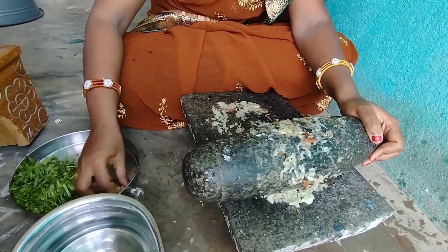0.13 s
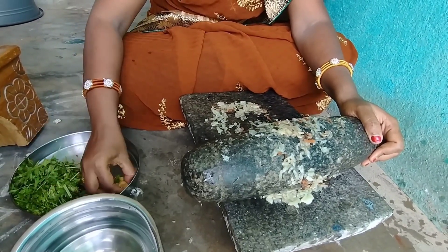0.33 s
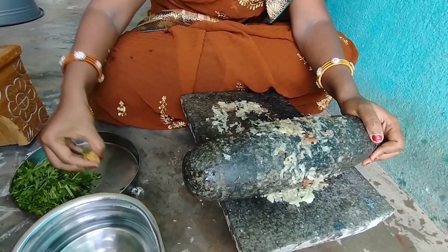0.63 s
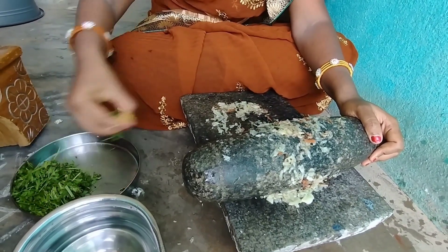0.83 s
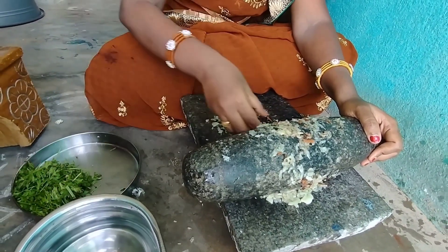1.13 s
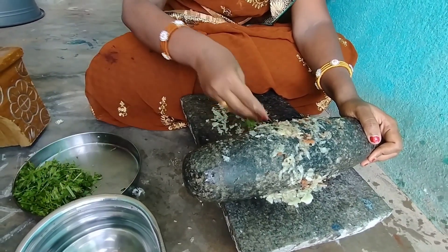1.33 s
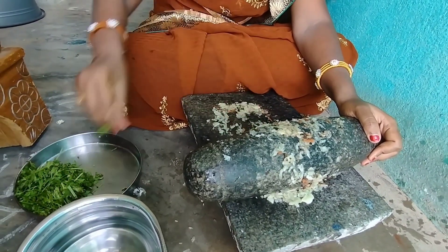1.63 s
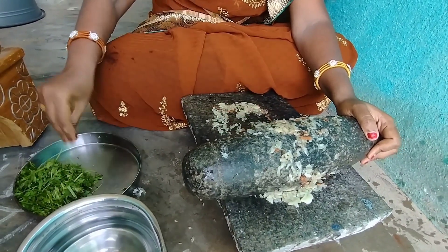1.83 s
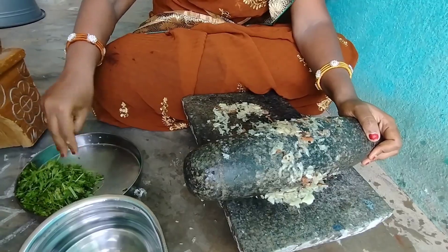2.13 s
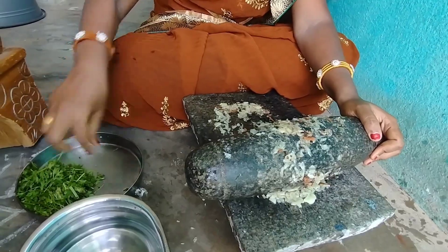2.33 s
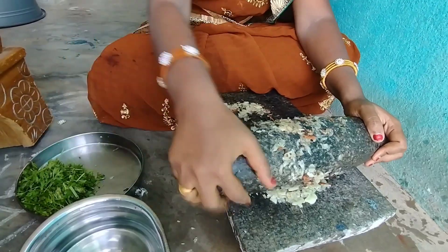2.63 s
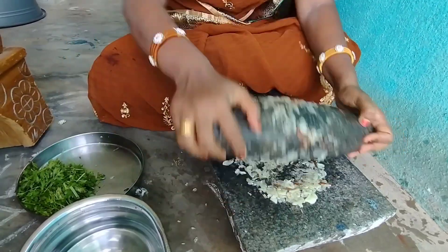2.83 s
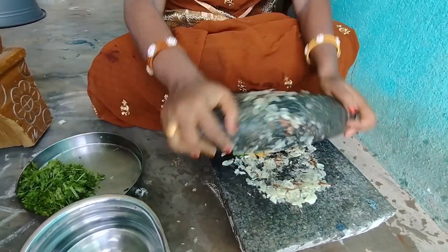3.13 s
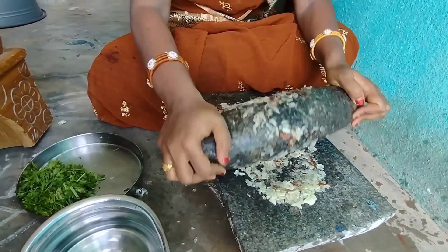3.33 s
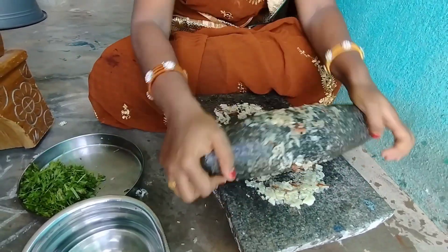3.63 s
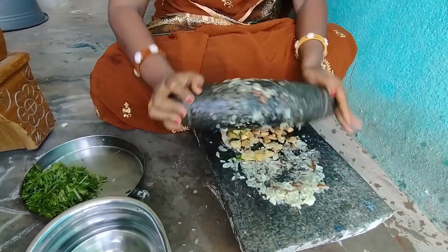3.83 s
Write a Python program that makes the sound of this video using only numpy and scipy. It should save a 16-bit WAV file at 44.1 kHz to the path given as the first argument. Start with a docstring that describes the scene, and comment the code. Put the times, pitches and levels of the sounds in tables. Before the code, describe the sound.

A stone roller crushing ginger and garlic on a slab is the main sound, close in a small room. First, ginger scratches on a ringing steel plate until 0.8 seconds. Bangles tick faintly from 1.6 to 2.6 over soft air. From 2.8 the pulp crackles and the roller rumbles, with a faint, far whistle. Stone knocks land at 3.0, loudest at 3.3, and at 3.6, where everything cuts off.

```python
"""In a small room with hard walls, a cook picks ginger from a steel plate, which scratches and rings.
Bangles tick in the pause. Then a stone roller rocks over wet ginger and garlic on a stone slab:
the pulp squelches and crackles, and the roller rumbles and knocks on the slab.
The walls throw the sound back, over soft air and a faint, far whistle.
The sound stops dead during the last knock."""
import sys
import numpy as np
from scipy import signal
from scipy.fft import rfft, irfft
from scipy.io import wavfile
from scipy.ndimage import uniform_filter1d

SR = 44100
rng = np.random.default_rng(int(sys.argv[2]) if len(sys.argv) > 2 else 0)


def bounce(signal):
    """Save signal as a 16-bit WAV file at the path given by the first command-line argument."""
    frames = np.transpose(np.atleast_2d(signal))
    limited = np.clip(frames, -1, 1)
    pcm = np.round(limited * 32767).astype(np.int16)
    wavfile.write(sys.argv[1], SR, pcm)


N = 176400
TIME, HZ = np.arange(N) / SR, np.fft.rfftfreq(4096, 1 / SR)

# Each blow of the roller: start_s, strength_db, treble_limit_hz, bass_limit_hz, ping_db
ROLLER_BLOWS = [(3.0123, -3, 1070, 90, -8), (3.0256, -8.5, 1050, 90, -17), (3.34, 3, 2300, 350, 8),
                (3.5911, 2, 352, 130, -29), (3.6126, -1.5, 747, 111, -12)]
# Tone of the dry clack of stone on stone: pitch_hz, level_db
CLACK_TONE = [(40, -41), (110, -15.5), (350, -2.5), (750, 9.5), (1000, 12), (1550, 5.5), (2200, -3.5),
              (3500, -3), (5000, -3.5), (8000, -27.5), (15000, -29)]
# Notes the slab and floor ring with: pitch_hz, level_db, ring_s
SLAB_NOTES = [(125, -32.5, .23), (181.2, -22, .17), (236, -23, 0.085), (349, -15.5, .08), (710, -30, .19),
              (853, -29.5, .23), (960, -7.5, 0.022), (1095, -26, 0.2), (1355, -29, 0.23),
              (1468, -24.5, 0.16)]
# Notes of the roller's own ping: pitch_hz, level_db, ring_s
ROLLER_NOTES = [(3466, -33.5, 0.045), (3580, -43, 0.08), (4495, -35, 0.059), (4545, -39.5, .15),
                (5345, -61, .25), (6700, -49.5, 0.23)]
def roller_knocks():
    """The roller lands: pulp cushions the blow, bare stone makes it thin and bright, with a ping."""
    blows, pings = np.zeros(N), np.zeros(N)
    for start_s, strength_db, treble_hz, bass_hz, ping_db in ROLLER_BLOWS:
        bass_loss = 1 + (bass_hz / (HZ + 1)) ** 2
        treble_loss = 1 + (HZ / treble_hz) ** 4.55
        add(blows, start_s, gain(strength_db) * make_filter(-10 * np.log10(bass_loss * treble_loss)))
        add(pings, start_s, gain(ping_db) * ring(ROLLER_NOTES))
    bass_cut = signal.butter(2, 95, "high", fs=SR, output="sos")  # thins the bass below 95 Hz
    blows = signal.sosfilt(bass_cut, blows)
    clack = make_filter(curve(CLACK_TONE))
    clacks = through(blows, clack / abs(clack).max())
    ringing = through(blows, ring(SLAB_NOTES)) + pings
    return clacks, ringing


# The roller settles into the pulp: start_s, rise_s, fall_s, level_db, pitch_hz
SOFT_LANDING = (3.5902, .004, .013, -15.5, 440)
def roller_thud():
    """A cushioned landing: one low, hollow note of the slab swells quickly and dies."""
    start_s, rise_s, fall_s, level_db, pitch_hz = SOFT_LANDING
    note = np.sin(2 * np.pi * pitch_hz * (TIME - start_s))
    return gain(level_db) * burst(start_s, rise_s, fall_s) * note


# Loudness of the steady crushing: time_s, level_db
CRUSH_LOUDNESS = [(2.79, -80), (2.82, -63), (3.0, -43), (3.05, -47.5), (3.19, -53), (3.25, -59),
                  (3.28, -44.5), (3.37, -57.5), (3.52, -53.5), (3.56, -47.5), (3.62, -50)]
# Pulp bursting under the roller: start_s, rise_s, fall_s, level_db
PULP_BURSTS = [(2.788, 0.0015, 0.005, -28), (2.8, 0.0018, 0.028, -43), (3.284, 0.0085, .007, -33.5),
               (3.396, 0.0064, 0.016, -46.5), (3.43, 0.014, 0.0055, -41), (3.565, 0.008, 0.0055, -28.5)]
# Tone of the wet crackle: pitch_hz, level_db
PULP_TONE = [(200, -15.5), (1500, -17), (3200, -10), (4500, -7.5), (6200, -3.5), (7500, -0.5), (8800, 1.5),
             (10800, -5.5), (12500, -14), (15500, -20)]
def crushed_pulp():
    """Wet fibres snap by the thousand under the roller, and squelch when the pulp bursts."""
    force = loudness(CRUSH_LOUDNESS) + bursts(PULP_BURSTS)
    return with_tone(force * crackle(snaps_per_s=7000, spread_db=3), PULP_TONE)


# Loudness of the rolling stone: time_s, level_db
RUMBLE_LOUDNESS = [(2.8, -68.5), (2.92, -58), (3.15, -54), (3.25, -61.5), (3.45, -58.5), (3.62, -78.5)]
# Tone of its rumble: pitch_hz, level_db
RUMBLE_TONE = [(30, -27), (140, 5.5), (800, -8.5), (1400, -1), (2400, -29.5), (6000, -58.5)]
def roller_rumble():
    """The stone roller rumbles on the slab as it turns."""
    return with_tone(loudness(RUMBLE_LOUDNESS) * noise(), RUMBLE_TONE)


# Fingers and ginger touch the plate: start_s, fall_s, scratch_db, knock_db, knock_pitch_hz
PLATE_TOUCHES = [(0.123, 0.035, -45, -52, 1040), (0.2232, 0.0071, -34, -35, 1000),
                 (0.2406, 0.028, -29.5, -50, 1430), (.28, 0.047, -39.5, -47, 1340),
                 (.323, 0.024, -41.5, -43.5, 870), (0.337, 0.01, -31, -48, 1150),
                 (0.355, 0.015, -41.5, -53, 1400), (.603, .013, -44, -48.5, 1320),
                 (.637, 0.036, -46.5, -46.5, 1450), (0.681, 0.022, -45.5, -38, 1255),
                 (.755, 0.021, -50, -48, 1380)]
# Tone of the scratching: pitch_hz, level_db
SCRATCH_TONE = [(500, -20.5), (3100, -7.5), (5200, -10.5), (6400, -4.5), (8700, 2.5), (9400, -10),
                (10400, -5), (12500, -18), (15500, -20)]
# Notes the steel rings with: pitch_hz, level_db, ring_s
PLATE_NOTES = [(747, 0.5, 0.037), (1487, 2, 0.071), (6480, 0.5, 0.05), (8860, -4.5, 0.057)]
# Hand and plate bump the floor softly: start_s, rise_s, fall_s, level_db
FLOOR_BUMPS = [(0.646, 0.0034, 0.022, -49.5), (0.745, 0.004, 0.013, -50)]
# Tone of those bumps: pitch_hz, level_db
BUMP_TONE = [(30, -10), (120, -1.5), (300, -9), (4000, -45)]
def steel_plate():
    """Ginger scratches and tumbles on the plate, which rings briefly and bumps the floor."""
    grit = with_tone(crackle(snaps_per_s=14000, spread_db=1.5), SCRATCH_TONE)
    tumble, touches = noise(), np.zeros((2, N))
    for start_s, fall_s, scratch_db, knock_db, pitch_hz in PLATE_TOUCHES:
        span = slice(round(start_s * SR), round(start_s * SR) + SR // 2)
        shape = burst(start_s, rise_s=0.0032, fall_s=fall_s)[span]
        scratch = gain(scratch_db) * shape * grit[:, span]
        knock = through(gain(knock_db) * shape * tumble[:, span], band(pitch_hz, width_octaves=0.58))
        touch = scratch + knock[:, :len(shape)]
        tuning = 1 + 0.014 * rng.uniform(-1, 1)  # pressing fingers shift the plate's notes a little
        steel = gain(-40.5) * ring(PLATE_NOTES, tuning)
        touches[:, span] += touch + through(touch, steel)[:, :len(shape)]
    bumps = with_tone(bursts(FLOOR_BUMPS) * noise(), BUMP_TONE)
    return gain(-1.5) * (touches + bumps)


# Bangles tick, leaves and fibres snap: start_s, level_db, pitch_hz, width_octaves
SMALL_TICKS = [(1.64, -57.5, 4540, 0.9), (1.914, -56.5, 8950, 0.42), (1.962, -56, 5300, 0.8),
               (2.235, -61.5, 4800, 0.67), (2.284, -54, 4670, 0.64), (2.585, -46.5, 2840, 0.97),
               (2.789, -29, 13100, 0.71), (2.801, -31.5, 6170, .2)]
def bangles_and_snaps():
    """Small dry ticks as the hand moves, each a tiny puff of hiss around one pitch."""
    hiss, ticks = noise(), np.zeros((2, N))
    for start_s, level_db, pitch_hz, width_octaves in SMALL_TICKS:
        puff = gain(level_db) * burst(start_s, rise_s=0.0018, fall_s=0.0066) * hiss
        ticks += through(puff, band(pitch_hz, width_octaves))
    return ticks


# The first echoes: delay_s, strength, treble_limit_hz
WALL_BOUNCES = [(.0016, 0.66, 12140), (.0072, .6, 450), (.0145, .33, 2000), (.0258, .18, 1990)]
def wall_echoes(sound):
    """The floor and nearest walls throw the sound back, later and duller."""
    bounces = np.zeros(SR // 4)
    for delay_s, strength, treble_hz in WALL_BOUNCES:
        add(bounces, delay_s, strength * make_filter(-10 * np.log10(1 + (HZ / treble_hz) ** 2)))
    return through(sound, bounces)


# How the room rings: pitch_hz, early_db, early_ring_s, late_db, late_ring_s
ROOM_RING = [(120, 5, 0.17, 1.5, 0.84), (348.4, -1, 0.22, 2.5, .5), (1020, 1.5, .13, -15.5, 0.58),
             (4000, -5, 0.13, -12.5, 0.51), (9050, -11, 0.045, -21.5, 0.25)]
def room_wash(sound):
    """Countless echoes blur into a quick early wash and a longer tail."""
    hiss = stereo(rng.choice([-1., 1.], (2, SR)))
    pitch_hz, time_s, bands = signal.stft(hiss, SR, nperseg=256)
    rows = np.array(ROOM_RING)
    early_db, early_s, late_db, late_s = (
        curve(np.c_[rows[:, 0], column], pitch_hz)[:, None] for column in rows.T[1:])
    power = 0
    for level_db, ring_s in [(early_db, early_s), (late_db, late_s)]:
        fade_rate = np.log(10 ** 6) / ring_s  # 60 dB quieter after ring_s
        power += gain(level_db) ** 2 * fade_rate / SR * np.exp(-fade_rate * time_s)
    tail = signal.istft(bands * np.sqrt(power), SR, nperseg=256)[1][:, :SR]
    delay_s, build_s = 0.00023, 0.004
    return through(sound, tail * np.clip((TIME[:SR] - delay_s) / build_s, 0, 1))


# The path of the whistle: time_s, pitch_hz, level_db
WHISTLE_PATH = [(2.53, 1235, -65.5), (2.74, 1242, -62.5), (2.81, 1400, -66.5), (2.87, 1436, -51.5),
                (2.98, 1425, -84)]
def far_whistle():
    """One faint, far tone slides upward and fades."""
    time_s, pitch_hz, level_db = np.transpose(WHISTLE_PATH)
    tone = np.sin(2 * np.pi * np.cumsum(np.interp(TIME, time_s, pitch_hz)) / SR)
    return tone * gain(np.interp(TIME, time_s, level_db, left=-120, right=-120))


# Tone of the background air: pitch_hz, level_db
AIR_TONE = [(25, -19), (60, -13), (140, 0), (750, -2), (1300, -4.5), (2000, -15.5), (6000, -15.5),
            (8600, -20), (15500, -32)]
# Its loudness: time_s, level_db
AIR_LOUDNESS = [(0, -61), (.65, -55), (1.3, -60.5), (2.4, -61.5), (2.8, -57.5)]
def background_air():
    """A soft, low hush whose level wavers gently."""
    waves = (np.sin(2 * np.pi * (rate_hz * TIME + rng.random())) for rate_hz in np.geomspace(3, 30, 20))
    waver_db = 1.6 * sum(waves) / np.sqrt(10)
    return with_tone(noise(), AIR_TONE) * loudness(AIR_LOUDNESS) * gain(waver_db)


def gain(level_db):
    """Turns decibels into a number to multiply a sound by."""
    return 10 ** (np.asarray(level_db) / 20)


def curve(rows, at_hz=HZ):
    """Joins (pitch_hz, value) rows with lines, giving every octave the same space."""
    pitch_hz, value = np.transpose(rows)
    return np.interp(np.log(at_hz + 1), np.log(pitch_hz + 1), value)


def loudness(rows):
    """Joins (time_s, level_db) rows into a gain over time, silent before the first row."""
    return gain(np.interp(TIME, *np.transpose(rows), left=-120))


def burst(start_s, rise_s, fall_s):
    """A level that climbs in a straight line, then dies away."""
    rise = np.clip((TIME - start_s) / rise_s, 0, 1)
    return rise * np.exp(-np.maximum(TIME - start_s - rise_s, 0) / fall_s)


def bursts(rows):
    """Adds up several bursts, each at its own level."""
    return sum(gain(db) * burst(start_s, rise_s, fall_s) for start_s, rise_s, fall_s, db in rows)


def add(mix, start_s, sound):
    """Mixes a sound in at the given time."""
    part = mix[round(start_s * SR):][:len(sound)]
    part += sound[:len(part)]


def make_filter(levels_db):
    """A filter with these levels from bass to treble, which makes no sound before it is struck."""
    log_gain = np.log(gain(np.maximum(levels_db, -100)))
    mirrored = np.r_[log_gain, log_gain[-2:0:-1]]
    spectrum = np.exp(signal.hilbert(mirrored).conj())
    return np.fft.ifft(spectrum).real[:len(levels_db)]


def through(sound, response):
    """Passes one or two channels through a filter."""
    return signal.fftconvolve(np.atleast_2d(sound), np.atleast_2d(response), axes=1)[:, :N]


def with_tone(sound, rows):
    """Gives a hiss or crackle the tone in a table, keeping its power about the same."""
    response = make_filter(curve(rows))
    return through(sound, response / np.linalg.norm(response))


def band(pitch_hz, width_octaves):
    """A filter that keeps the sound around one pitch and drops steeply on both sides."""
    distance = np.log2((HZ + 1) / pitch_hz) / width_octaves
    response = make_filter(-20 * np.log10(1 + distance ** 4 / 2))
    return response / np.linalg.norm(response)


def ring(notes, tuning=1):
    """The notes of a struck object, each 60 dB quieter after its ring_s."""
    t = TIME[:SR // 2]
    return sum(gain(db) * np.exp(-np.log(1000) * t / ring_s) * np.cos(2 * np.pi * pitch_hz * tuning * t)
               for pitch_hz, db, ring_s in notes)


def crackle(snaps_per_s, spread_db):
    """Tiny snaps of uneven size that come in clumps."""
    clumps = uniform_filter1d(rng.standard_normal(N), int(0.005 * SR))  # about 5 ms each
    clump_db = 2.6 * clumps / clumps.std()
    size = gain(clump_db + spread_db * np.minimum(rng.exponential(1, (2, N)), 4))
    snaps = size * rng.choice([-1, 1], (2, N)) * (rng.random((2, N)) < snaps_per_s / SR)
    return stereo(snaps / snaps.std())


def noise():
    """An even hiss at both microphones."""
    return stereo(rng.standard_normal((2, N)))


# How alike left and right are (1 means the same): pitch_hz, likeness
SIDE_LIKENESS = [(100, 1), (600, 0.99), (1600, 0.84), (5000, 0.79), (15000, 0.68)]
def stereo(sounds):
    """Turns two unrelated sounds into a left and right that are most alike in the bass."""
    first, second = rfft(sounds)
    likeness = np.clip(curve(SIDE_LIKENESS, np.fft.rfftfreq(sounds.shape[1], 1 / SR)), 0, 1)
    middle, side = first * np.sqrt((1 + likeness) / 2), second * np.sqrt((1 - likeness) / 2)
    return irfft(np.array([middle + side, middle - side]), sounds.shape[1])


def scene():
    """The cook's work, the room's answer and the background together."""
    clacks, ringing = roller_knocks()
    near = clacks + crushed_pulp() + roller_rumble() + steel_plate() + bangles_and_snaps()
    room = wall_echoes(near) + room_wash(near)
    return near + ringing + roller_thud() + room + far_whistle() + background_air()


# Dips in the microphones' tone, a bit lower on the left, higher on the right: pitch_hz, width_hz, dip_db
MICROPHONE_DIPS = [(2440, 270, -14.5), (4910, 620, -9), (7234, 644, -10.5)]
# Balance between the sides: pitch_hz, left_minus_right_db
SIDE_BALANCE = [(60, -3.5), (240, -4), (950, -1.5), (3000, -1), (15000, -4)]
def record(dry):
    """Two microphones colour the sound and clip loud peaks; it stops dead and loses its top treble."""
    dip_ratio, peak_limit, top_hz = 1.04, 0.93, 16000
    stop_s, fade_s = 3.6245, 0.001
    left_db, right_db = (
        sum(db * np.exp(-((HZ - hz * shift) / width_hz) ** 2) for hz, width_hz, db in MICROPHONE_DIPS)
        for shift in (dip_ratio ** -.5, dip_ratio ** .5))
    lean_db = curve(SIDE_BALANCE) / 2
    heard = through(dry, [make_filter(left_db + lean_db), make_filter(right_db - lean_db)])
    clipped = np.clip(heard, -peak_limit, peak_limit)
    stopped = clipped * np.clip((stop_s - TIME) / fade_s, 0, 1)
    treble_cut = signal.firwin(511, top_hz, window=("kaiser", 9), fs=SR)
    return signal.oaconvolve(stopped, treble_cut[None], "same")


dry = scene()
out = record(dry)
bounce(out)
```